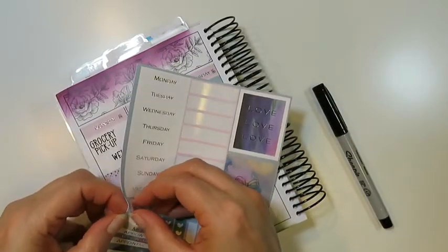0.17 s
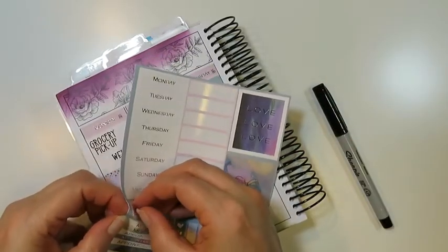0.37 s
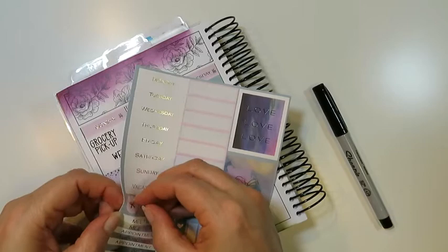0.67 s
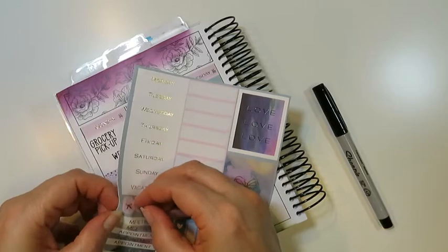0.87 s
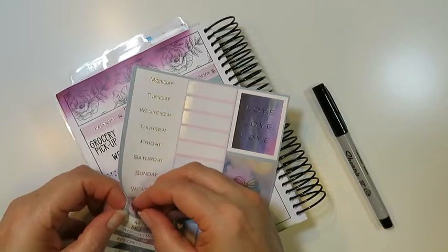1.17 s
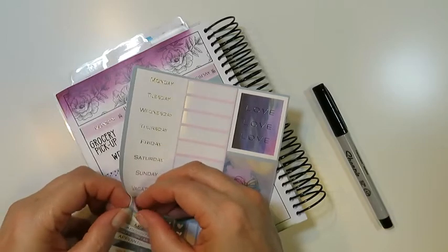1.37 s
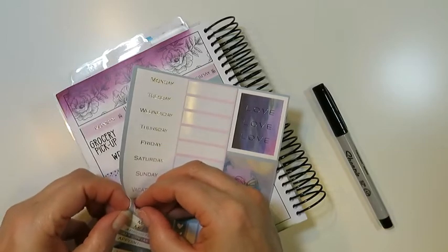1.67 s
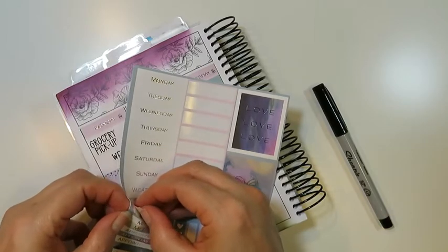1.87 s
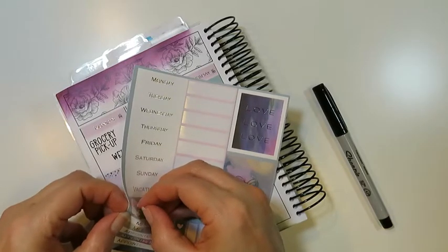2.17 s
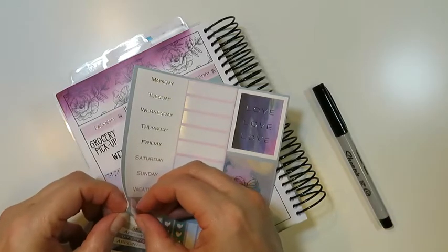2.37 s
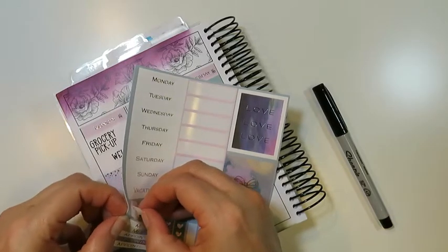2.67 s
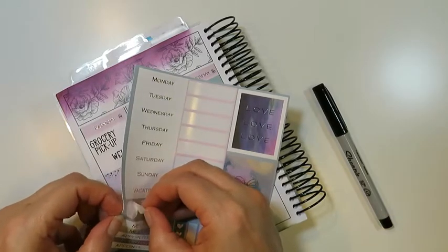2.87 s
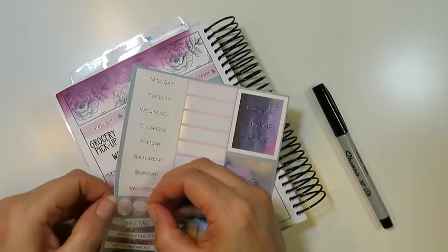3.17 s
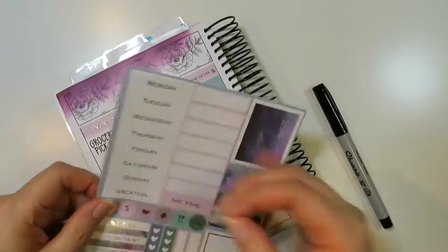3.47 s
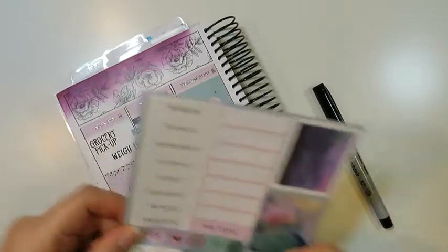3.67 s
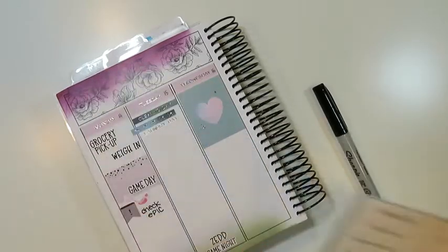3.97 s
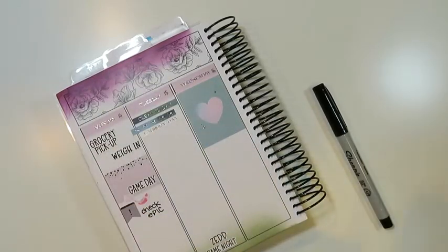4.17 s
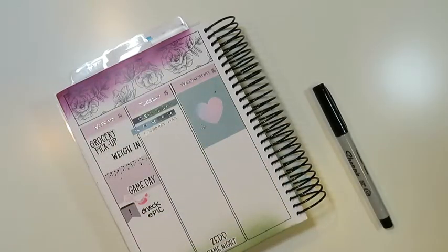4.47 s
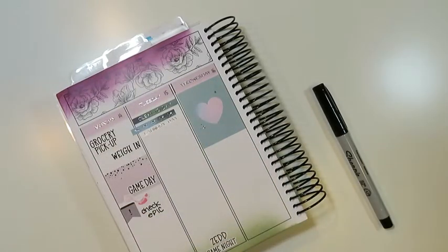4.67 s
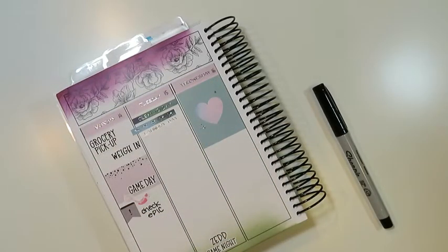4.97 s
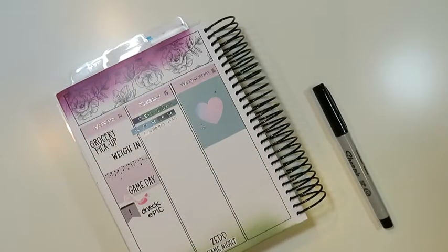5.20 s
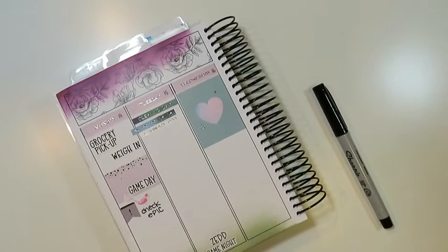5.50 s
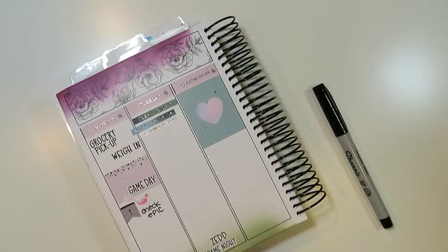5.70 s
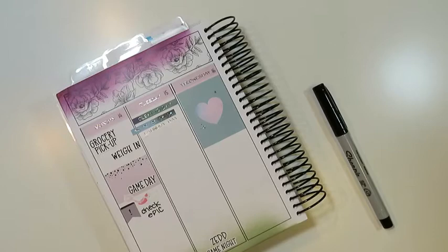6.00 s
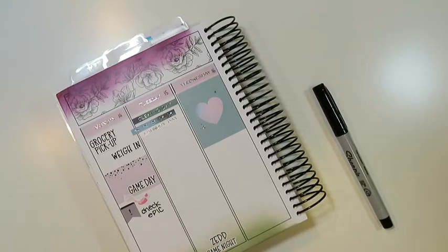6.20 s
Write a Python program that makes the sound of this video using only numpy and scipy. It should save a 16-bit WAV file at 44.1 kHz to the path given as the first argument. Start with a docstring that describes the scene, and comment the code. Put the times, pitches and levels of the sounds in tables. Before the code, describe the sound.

An intimate stereo close-up at a desk: scattered dry ticks and short finger rubs, a pause, then a hard paper snap, a flurry of tiny sticky pops and another snap. Paper swishes and shuffles away, bumping softly against desk and planner. A faint, thin tone flutters briefly beneath the last handling, then only steady quiet air remains, with one tiny late knock.

```python
"""Fingernails pick at a sticker on a stiff sheet above a desk in a small quiet room: the sheet ticks and rubs,
snaps twice as it buckles while the glue pops finely, then is carried aside, rustling and knocking planner and desk;
near the end a thin tone wavers. Ticks, pops and knocks are impulse responses with scattered bending waves;
rubbing is a train of random slips, swings are decaying sines, and the shuffle is filtered noise.
Short reflections follow the close sounds, over a steady room tone."""
import sys
import numpy as np
from scipy import signal
from scipy.fft import rfft, irfft
from scipy.io import wavfile
from scipy.ndimage import uniform_filter1d

SR = 44100
rng = np.random.default_rng(int(sys.argv[2]) if len(sys.argv) > 2 else 0)


def dump_mix(stems):
    """Bounce the given channels to the path in sys.argv[1] as a 16-bit WAV at rate SR."""
    frames = np.atleast_2d(stems).T  # one column per channel
    limited = np.clip(frames, -1, 1)  # hard clip at full scale
    pcm = np.round(limited * 32767).astype(np.int16)
    wavfile.write(sys.argv[1], SR, pcm)


N = 279638
TIME = np.arange(N) / SR

# Ticks and snaps of the sheet: t/s, strength/dB, then relative to the middle band
# bass/dB, presence/dB, air/dB, and stiffness (factor on pitch)
SHEET_TICKS = [(0.096, -11.5, 5, -1, -4, 1), (0.1145, 1, 7, 1.5, 3, 0.96),
               (0.3514, 3.5, -3, -1.5, -3.5, 1.11), (0.5639, -8.5, -7, 6.5, 14.5, 0.86),
               (0.5953, -15, 0, 10.5, 4, 0.94), (0.662, -9, -12, 4, -2, 0.63),
               (0.6849, -5, 14.5, -4.5, -11, 1.47), (0.7494, -14, 11, 9.5, -15, 1),
               (0.827, -10.5, 10, -5, -11, 1.1), (0.8627, -15.5, 21, 7, 1, 1.32),
               (1.6027, -11, 12, 10, 1, 1), (1.6207, -15.5, -2, 15.5, 10, 1.07),
               (2.1423, 2.5, -26, -10.5, -16, 1.06), (2.1722, 17.5, -19.5, -1, 0, 1.02),
               (2.9353, 18.5, -1, 3, 3.5, 0.98), (3.686, 4, -5, -6, -24, 0.89),
               (4.071, 1.5, -2, -11.5, -11, 1.08), (4.327, -6.5, -5, -3, -15, 0.54)]
# Pops of the glue letting go: t/s, strength/dB, brightness/dB (the presence of the blow)
GLUE_POPS = [(2.009, -4, 2), (2.034, -9, 7.5), (2.532, -14, -2.5), (2.586, -17, -4), (2.5971, -10.5, -6),
             (2.64, -1.5, -10.5), (2.7294, -2.5, -3.5), (2.7508, -19, 4), (2.7745, -16.5, 5),
             (2.8117, -10.5, -2), (2.8223, -17, 3), (2.8369, -6, 2), (2.848, -9.5, -1), (2.9207, -7, 9.5),
             (2.925, 5, -6), (2.9307, -6, 4)]
POP_BASS_DB, POP_STIFFNESS = -15, 0.93
POP_AIR_DB, POP_AIR_PER_BRIGHT_DB = 12, 0.69


def ticks():
    """Impulsive excitation: nails slip off the sticker's edge, glue lets go, and the stiff sheet buckles."""
    blows = list(SHEET_TICKS)
    for s, strength_db, bright_db in GLUE_POPS:
        air_db = POP_AIR_DB + POP_AIR_PER_BRIGHT_DB * bright_db
        blows.append((s, strength_db, POP_BASS_DB, bright_db, air_db, POP_STIFFNESS))
    out = np.zeros((2, N))
    for row in blows:
        for s, sound in click(*row):
            add(out, s, sound)
    return out


# Response of the sheet to a sharp blow: f/Hz, level/dB
SHEET_RESPONSE = [(100, -16), (280, -12.5), (450, -7), (900, -2.5), (1470, 2), (1740, -9.5), (2180, -12),
                  (2460, -1.5), (3100, -3), (4400, -10), (6400, -19.5), (7600, -20.5), (8900, -28),
                  (15000, -31.5)]
# Faint, short pitched ringing added after each tick and pop: f/Hz, level/dB relative to the blow, t60/s
CLICK_RINGING = [(811, -57, 0.12), (1003, -65, 0.3), (2480, -63, 0.2), (2740, -47.5, 0.081),
                 (2790, -65, 0.058), (2900, -74, 0.13), (3350, -73, 0.071), (3640, -52, 0.058)]


def click(s, strength_db, bass_db, presence_db, air_db, stiffness, lag_s=0.00095, ring_db=-5):
    """Impulse response plus a weak sum of decaying sines, as (start s, sound) pairs."""
    crack = blow(SHEET_RESPONSE, strength_db, bass_db, presence_db, air_db, stiffness, lag_s=lag_s,
                 scatter_db=-12.5, scatter_t60=0.016, fizz_db=-3.5, fizz_t60=0.013)
    ring_gain = amp(strength_db + presence_db / 2 + ring_db)
    return [(s - lag_s / 2, crack), (s, ring_gain * ring(CLICK_RINGING, stiffness))]


# Centres of bass, middle, presence and air: f/Hz
BAND_CENTRES = [380, 1200, 3300, 9000]


def blow(body, strength_db, bass_db, presence_db, air_db, stiffness, lag_s,
         scatter_db, scatter_t60, fizz_db, fizz_t60, size=2048):
    """Dispersion and scattering: one push on a body, then bending waves returned from its edges."""
    hz, t = np.fft.rfftfreq(size, 1 / SR), np.arange(size) / SR
    tilt_db = read(list(zip(BAND_CENTRES, [bass_db, 0, presence_db, air_db])), hz)
    push = causal(strength_db + read(body, hz / stiffness) + tilt_db)
    # long bending waves travel slower than short ones, which spreads the click into a short chirp
    delay_s = lag_s / np.sqrt(1 + hz / 1200)
    phase = 2 * np.pi * np.cumsum(delay_s) * SR / size
    push = irfft(rfft(push) * np.exp(-1j * phase))
    # scattered waves build up within a few milliseconds, then decay
    waves = rng.standard_normal(size) * amp(-60 * t / scatter_t60) * (1 - np.exp(-t / 0.00076))
    direct_and_waves = 1 + amp(scatter_db) * rfft(unit(waves)) / np.sqrt(size)
    # the shortest waves break up into a brief fizz that reaches each microphone differently
    fizz = rng.standard_normal((2, size)) + 0.47 * rng.standard_normal(size)
    fizz = fizz * amp(-60 * t / fizz_t60)
    share = amp(fizz_db) * (hz / 8000) ** 2
    blend = direct_and_waves + share * rfft(unit(fizz)) / np.sqrt(size)
    spread = irfft(blend / np.sqrt(1 + share ** 2))
    return signal.fftconvolve(spread[:, :size * 3 // 4], push[None], axes=1)


# Bending modes of the sheet after a blow: t/s, level/dB (initial amplitude), f/Hz, t60/s
SHEET_SWINGS = [(0.351, -37, 56.4, 0.14), (.565, -46, 2580, 0.078), (0.684, -34.5, 1540, 0.027),
                (0.749, -37, 1516, .04), (2.835, -34.5, 1490, 0.04), (2.9358, -25, 490, 0.016),
                (3.794, -31.5, 118, 0.075), (3.873, -41, 130, 0.068), (4.329, -32, 1490, 0.015),
                (6.169, -44, 194, 0.05)]


def swings(size=9000):
    """Free decay of single modes: low for the whole sheet, high where fingers hold a short span."""
    out, t = np.zeros(N), np.arange(size) / SR
    for s, db, hz, t60 in SHEET_SWINGS:
        add(out, s, -amp(db - 60 * t / t60) * np.sin(2 * np.pi * hz * t))
    return out


# Strokes of fingers and paper: start t/s, length/s, level/dB (before tilt), brightness/dB, edge hiss/dB
RUB_STROKES = [(0.096, 0.024, -50, -5, 0), (0.339, 0.0099, -42.5, 3, -14), (0.545, 0.066, -47, 0, 1),
               (0.619, 0.077, -52, -1, 6), (0.709, .016, -51.5, 7, -1), (0.742, 0.049, -47, 4, -15),
               (0.795, .14, -62, -5, 0), (1.05, 0.038, -57.5, -6, 0), (1.304, 0.044, -57, 5.5, -4),
               (2.04, 0.17, -58.5, -2, 12), (2.454, 0.023, -55, -5.5, 0), (2.576, .08, -62, 2, 15),
               (2.821, 0.033, -54.5, 12, 0), (2.915, 0.017, -39, 3, 5), (2.94, .05, -50, -6, 0),
               (3.043, .14, -55, 1, 0), (3.218, 0.086, -55, 4, 3), (3.35, .05, -55, 5, -2),
               (3.402, 0.016, -50, 5, 15), (3.437, .14, -56, 7, 11), (3.583, 0.11, -57, 3, 9),
               (3.643, 0.033, -49, 3, 6), (3.673, 0.027, -46, -2, 11), (3.703, 0.077, -54.5, 3, 7),
               (3.895, 0.025, -45, 4.5, 1.5), (3.956, 0.14, -55.5, -1.5, 13), (4.094, 0.031, -60, 10, 15),
               (4.259, 0.23, -62, -4, 0), (4.49, 0.087, -58, 3, 10)]
RUB_ATTACK_S, RUB_SAG_DB, RUB_RELEASE_S = 0.011, -0.5, 0.013
# fingers never rest while they hold the sheet
HOLD_UNTIL_S, HOLD_DB = 5.1, -70.5
# Spectrum of the rubbing: f/Hz, level/dB (per Hz)
RUB_SPECTRUM = [(150, -36), (500, -2.5), (900, 4.5), (1550, 7), (2100, 1.5), (2800, 0.5), (4200, -5.5),
                (7000, -15), (10000, -25), (15000, -53)]
# Change per dB of brightness: f/Hz, level/dB
BRIGHTNESS_TILT = [(1500, -0.47), (2700, 0.9), (3900, 0.64), (6500, 0.87)]
# Change per dB of edge hiss: f/Hz, level/dB
EDGE_HISS_TILT = [(4500, 0.057), (9000, 0.89), (15000, 1.5)]


def rubbing(slips_per_s=2200, spread_db=3.0, smooth=0.091, patchy_db=3, clump_db=1.5):
    """Friction: a dense train of tiny slips, coloured by resonances that shift as the sheet flexes."""
    sizes = amp(spread_db * np.minimum(rng.exponential(1, (2, N)), 4)) * rng.choice([-1, 1], (2, N))
    happens = rng.random((2, N)) < slips_per_s / SR
    slips = sizes * happens + smooth * rng.standard_normal((2, N))
    slips = pair(slips, RUB_SPECTRUM, [(300, 1.0), (1400, 1.0), (4000, 0.89), (12000, 0.23)])
    # the slips come in clumps of a few milliseconds
    clumps = unit(uniform_filter1d(rng.standard_normal(N), size=200))
    slips = unit(slips * amp(clump_db * clumps))
    hz, t, z = signal.stft(slips, SR, nperseg=512)
    # patches of raised and lowered level across frequency and time
    patches = uniform_filter1d(rng.standard_normal(z.shape[1:]), size=5, axis=0)
    patches = unit(uniform_filter1d(patches, size=6, axis=1))
    # strokes add in power, and the strongest one dominates the colour
    power = amp(2 * HOLD_DB) * (TIME < HOLD_UNTIL_S) + 1e-12
    bright, edge = 0, 0
    for start, length, db, bright_db, edge_db in RUB_STROKES:
        envelope = gesture(start, length, RUB_ATTACK_S, RUB_SAG_DB, RUB_RELEASE_S)
        stroke = (amp(db) * envelope) ** 2
        power = power + stroke
        bright = bright + bright_db * stroke
        edge = edge + edge_db * stroke
    bright_tilt_db = np.outer(read(BRIGHTNESS_TILT, hz), np.interp(t, TIME, bright / power))
    edge_tilt_db = np.outer(read(EDGE_HISS_TILT, hz), np.interp(t, TIME, edge / power))
    coloured = z * amp(bright_tilt_db + edge_tilt_db + patchy_db * patches)
    return np.sqrt(power) * signal.istft(coloured, SR)[1][:, :N]


# Soft knocks of hand and sheet on planner and desk: t/s, strength/dB, then relative to the middle band
# bass/dB, presence/dB, air/dB, and stiffness (factor on pitch)
SOFT_KNOCKS = [(0.78, -16.5, 13.5, 11, -17, 1.83), (1.316, -5, 3, -17, -6, 2.1),
               (1.338, -10.5, 9, -9, -8, 1.86), (3.4892, 7.5, -1.5, 12.5, 4.5, 1.03),
               (3.5148, 2.5, 3.5, 2, 7, 0.91), (3.5884, -5, 1, -16, 10, 1.16),
               (3.6129, -3, -8, -12, -4, 0.93), (3.717, -5, 2, -8, 8.5, 1.12),
               (3.7947, 0, 10.5, -12, -14, 1.1), (3.802, -3.5, -0.5, -12, -18, 0.73),
               (3.827, -16, 12, 0, 0, 1.2), (3.8713, -17, 6.5, 0, 0, 1.03),
               (4.028, -9.5, -8, -19, -2, 0.84), (4.5, -8.5, -7, -8, -4, 1.3),
               (4.532, -18, 9.5, 10, -4, 0.69), (6.167, -15, 3, 11, 0, 1.47)]
# Response of sheet and planner together to a soft blow: f/Hz, level/dB
THUD_RESPONSE = [(80, -8.5), (210, -6.5), (380, 8), (500, -6), (680, -7), (850, 1.5), (1050, -2),
                 (1280, -4.5), (1600, -1.5), (2000, -17.5), (3200, -27), (7500, -32), (15000, -46)]
# Ringing of planner and desk: f/Hz, level/dB relative to the blow, t60/s
DESK_MODES = [(221, -44, 0.15), (359, -42, 0.077), (432, -41, 0.05), (906, -49, 0.055), (1063, -28, 0.021),
              (1510, -49, 0.033)]


def knocks(lag_s=0.0022):
    """Coupled modal response: dull blows also set planner and desk ringing."""
    out = np.zeros((2, N))
    for s, strength_db, *colour in SOFT_KNOCKS:
        thud = blow(THUD_RESPONSE, strength_db, *colour, lag_s=lag_s,
                    scatter_db=-5.5, scatter_t60=0.056, fizz_db=1.5, fizz_t60=0.021)
        add(out, s - lag_s / 2, thud)
        add(out, s, amp(strength_db - 5) * ring(DESK_MODES, rng.uniform(0.9, 1.02)))
    return out


# Hands and sheet shifting over the desk: start t/s, length/s, level/dB
DESK_SHIFTS = [(0.356, 0.072, -58), (0.583, 0.31, -61), (3.1, 0.21, -59), (3.375, 0.23, -53),
               (3.658, 0.068, -48), (3.75, .17, -57.5), (4.02, .08, -55), (4.493, 0.12, -60)]
SHIFT_ATTACK_S, SHIFT_SAG_DB, SHIFT_RELEASE_S = 0.028, -2, 0.018
# Spectrum of the low shuffle: f/Hz, level/dB (per Hz)
SHIFT_SPECTRUM = [(25, -17), (75, 2), (170, -1.5), (400, -7), (800, -15), (2000, -28)]


def shifting():
    """Low-frequency friction noise: hands and sheet shuffle over the desk."""
    motion = np.zeros(N)
    for start, length, db in DESK_SHIFTS:
        motion += amp(db) * gesture(start, length, SHIFT_ATTACK_S, SHIFT_SAG_DB, SHIFT_RELEASE_S)
    return motion * pair(rng.standard_normal((2, N)), SHIFT_SPECTRUM, [(100, 1.0), (600, 0.53)])


TONE_START_S, TONE_LENGTH_S, TONE_DB, TONE_HZ = 4.265, 0.48, -53.5, 475


def faint_tone(waver=0.00696, flutter_db=6.5):
    """Random frequency and amplitude modulation: a thin, wavering tone as the sheet is put away."""
    drift = unit(uniform_filter1d(rng.standard_normal((2, N)), size=900))
    tone = np.sin(2 * np.pi * np.cumsum(TONE_HZ * (1 + waver * drift[0])) / SR)
    tone = unit(tone * amp(flutter_db * drift[1]))
    envelope = gesture(TONE_START_S, TONE_LENGTH_S, attack_s=0.0089, sag_db=-3.0, release_s=0.015)
    return amp(TONE_DB) * envelope * tone


# Reverberant tail of the room: f/Hz, level/dB, t60/s
ROOM_TAIL = [(150, -8, 0.099), (500, -3.5, 0.07), (1400, -11.5, 0.21), (3200, -11.5, 0.15),
             (7000, -11.5, 0.2), (15000, -11, 0.12)]


def room(x, side_db=-6, onset_s=0.0039, size=16384):
    """Reverberation: dense reflections from desk and near walls, each band decaying at its own rate."""
    mid, side = rng.standard_normal((2, size))
    taps = unit(np.array([mid + amp(side_db) * side, mid - amp(side_db) * side]))
    hz, t, z = signal.stft(taps, SR, nperseg=256)
    t60 = read(ROOM_TAIL, hz, axis=2)[:, None]
    decay = amp(read(ROOM_TAIL, hz)[:, None] - 60 * t / t60)
    # a band's energy should follow its level, however long it rings
    equal_energy = np.sqrt(2 * np.log(1000) / (t60 * SR))
    tail = signal.istft(z * decay * equal_energy, SR)[1][:, :size]
    tail = tail * np.minimum(np.arange(size) / SR / onset_s, 1) ** 2
    return signal.fftconvolve(x.mean(0)[None], tail, axes=1)[:, :N]


# Spectrum of the room tone: f/Hz, level/dB (per Hz, relative)
AIR_SPECTRUM = [(15, -22), (30, -5.5), (55, -9), (95, -3), (140, -4.5), (250, -4.5), (480, -5.5),
                (700, -5.5), (950, -10), (1500, -11), (3000, -15), (7500, -23.5), (14000, -33),
                (16000, -45)]
AIR_DB = -51.5
# Left-right likeness of the room tone: f/Hz, coherence
AIR_COHERENCE = [(50, 1), (130, 0.69), (290, 0), (640, 0.19), (1400, 0), (3100, 0.17), (15000, 0.31)]


def room_tone():
    """Stationary noise of partial coherence: ventilation rumble and microphone hiss."""
    return amp(AIR_DB) * pair(rng.standard_normal((2, N)), AIR_SPECTRUM, AIR_COHERENCE)


def ring(modes, stiffness, size=6000):
    """Superposition: a sum of decaying sines."""
    t = np.arange(size) / SR
    return sum(amp(db - 60 * t / t60) * np.sin(2 * np.pi * hz * stiffness * t) for hz, db, t60 in modes)


def gesture(start, length, attack_s, sag_db, release_s):
    """Amplitude envelope of one movement: linear rise, sagging hold, exponential release."""
    t = np.maximum(TIME - start, 0)
    rise = np.minimum(t / attack_s, 1)
    sag = amp(sag_db * np.minimum(t / length, 1))
    return rise * sag * np.exp(-np.clip((t - length) / release_s, 0, 20))


def pair(x, colour, likeness):
    """Mid-side coherence: two unrelated signals become a coloured stereo pair of rms 1."""
    hz, (a, b) = np.fft.rfftfreq(N, 1 / SR), rfft(x)
    same = np.clip(read(likeness, hz), -1, 1)
    mid, side = a * np.sqrt(1 + same), b * np.sqrt(1 - same)
    return unit(irfft(np.array([mid + side, mid - side]) * amp(read(colour, hz)), N))


def causal(db, size=2048):
    """Minimum phase by folding the cepstrum: the most compact causal ring with this spectrum."""
    cepstrum = irfft(np.log(amp(db)))
    cepstrum[1:size // 2] *= 2
    cepstrum[size // 2 + 1:] = 0
    return irfft(np.exp(rfft(cepstrum)))


def read(points, hz, axis=1):
    """Logarithmic frequency scale: interpolates one column of a table along it."""
    columns = np.transpose(points)
    return np.interp(np.log(hz + 1), np.log(columns[0] + 1), columns[axis])


def add(mix, s, sound):
    """Superposition: mixes a sound in at time s."""
    part = mix[..., max(round(s * SR), 0):][..., :sound.shape[-1]]
    part += sound[..., :part.shape[-1]]


def amp(db):
    """Level to amplitude: decibels become gain."""
    return 10 ** (np.asarray(db) / 20)


def unit(x):
    """Mean-square normalisation: scales to rms 1."""
    return x / np.sqrt(np.mean(x ** 2) + 1e-20)


def scene():
    """Direct sound plus reflections, with the faint tone and the quiet room added."""
    close = ticks() + knocks() + swings() + rubbing() + shifting()
    return close + room(close) + faint_tone() + room_tone()


CUT_HZ = 15900


def record(dry):
    """Band limitation: a linear-phase low-pass removes the highest treble."""
    low_pass = signal.firwin(255, CUT_HZ, window=("kaiser", 8), fs=SR)
    return signal.oaconvolve(dry, low_pass[None], "same", axes=1)


dry = scene()
out = record(dry)
dump_mix(out)
```